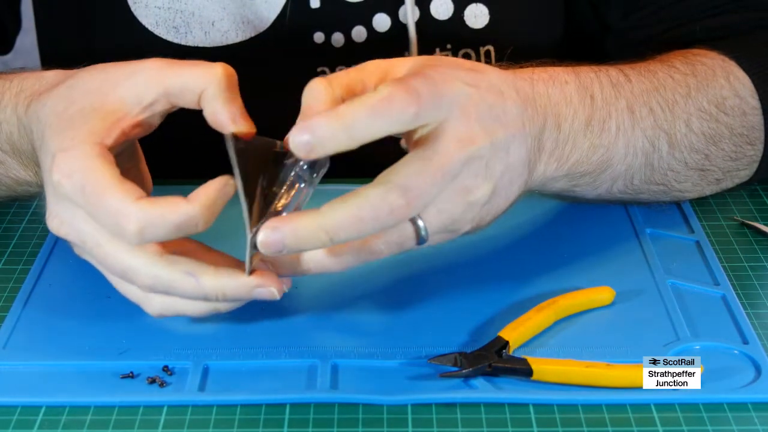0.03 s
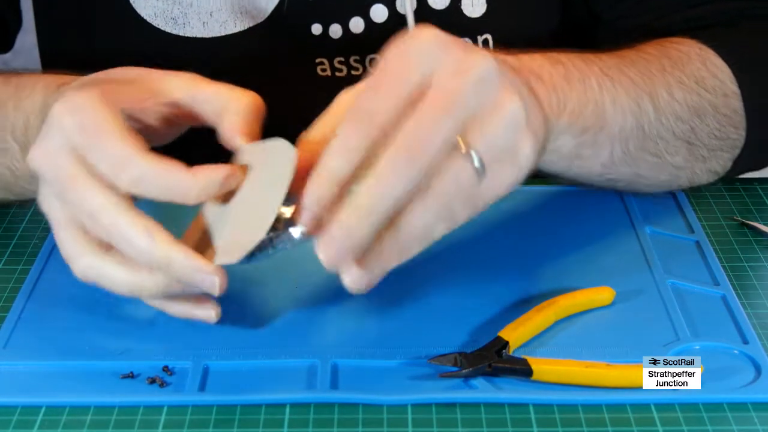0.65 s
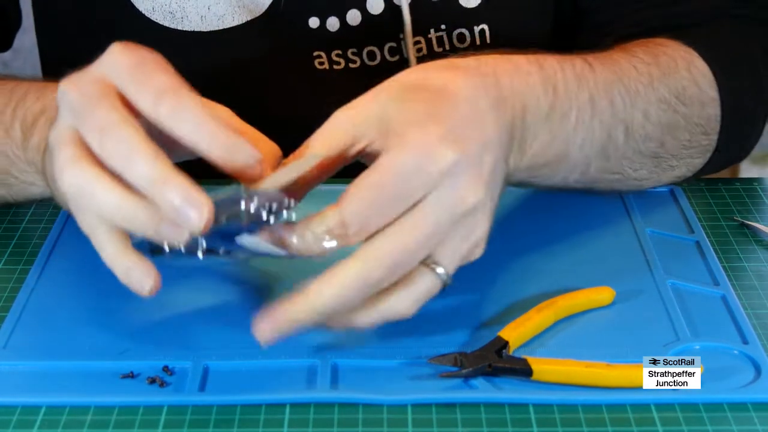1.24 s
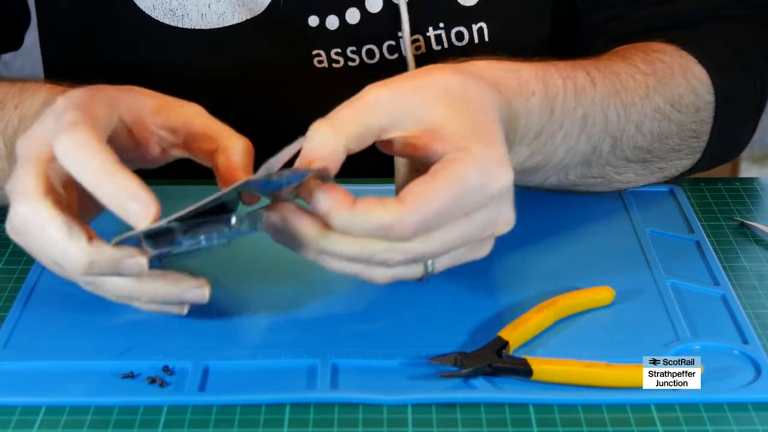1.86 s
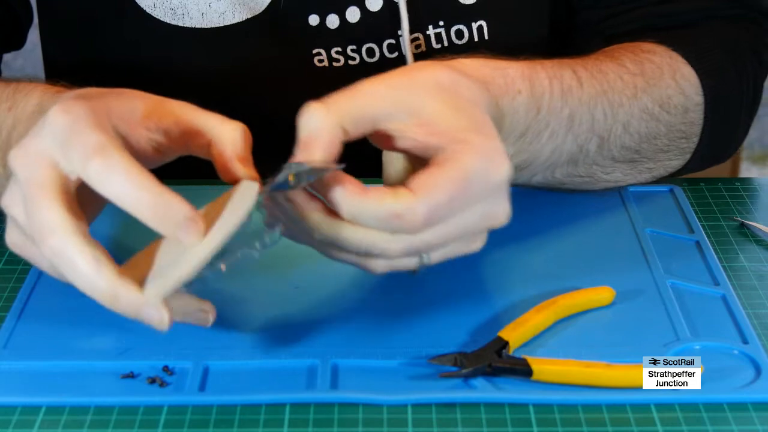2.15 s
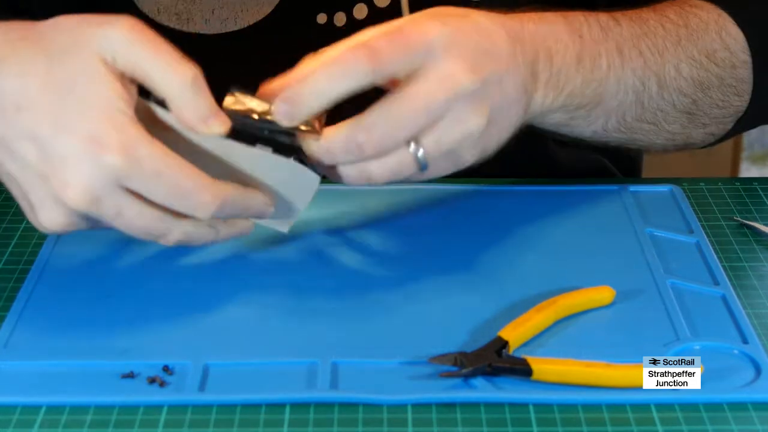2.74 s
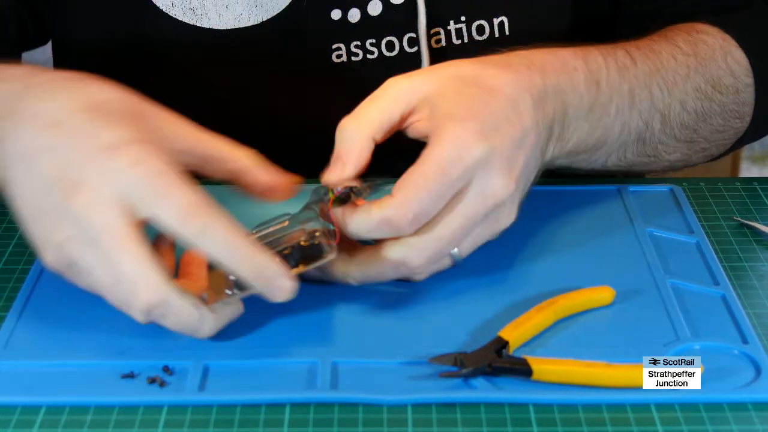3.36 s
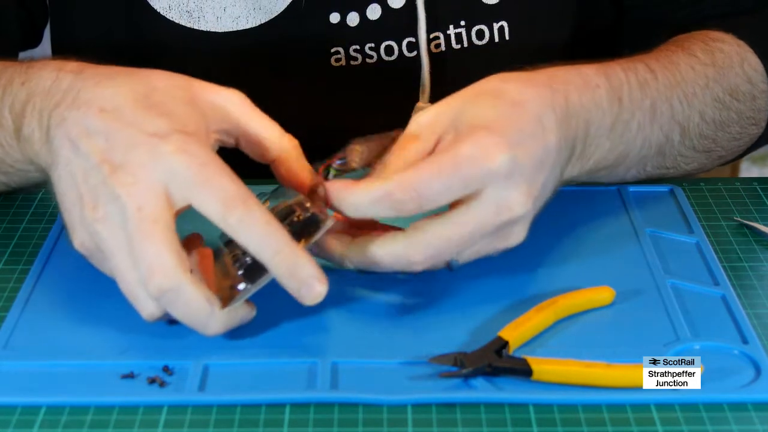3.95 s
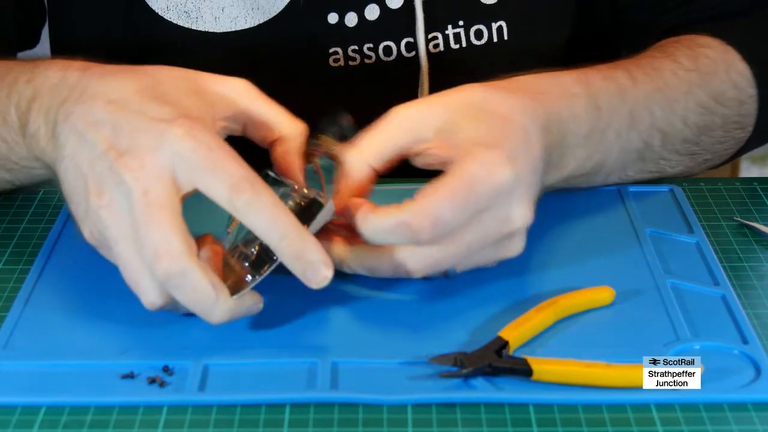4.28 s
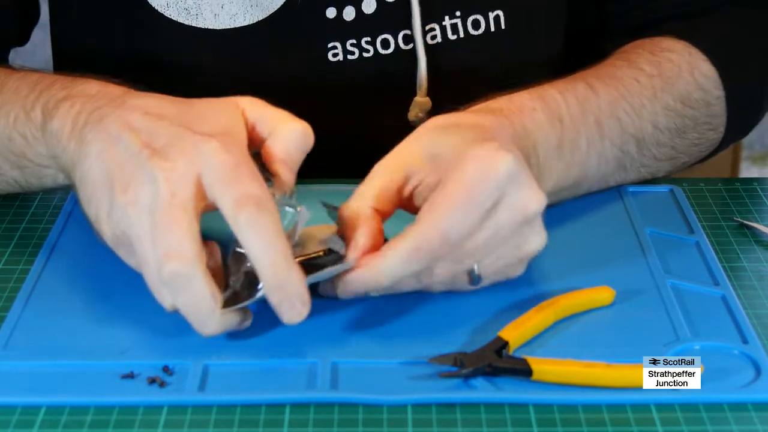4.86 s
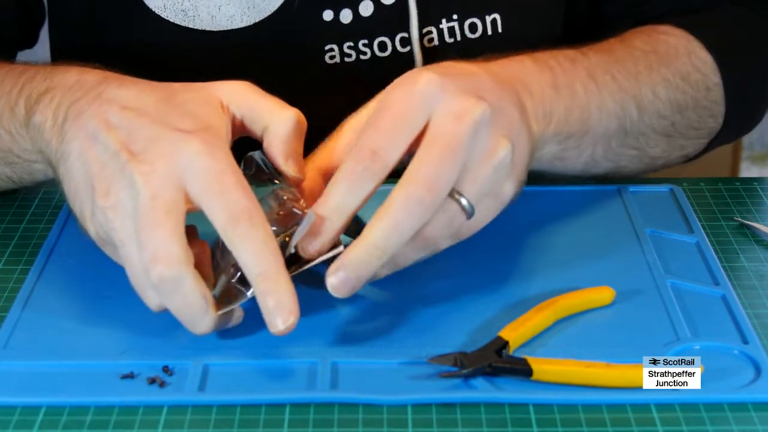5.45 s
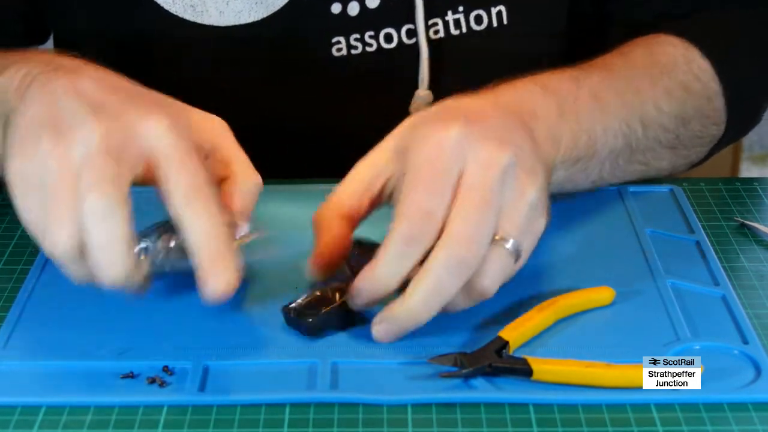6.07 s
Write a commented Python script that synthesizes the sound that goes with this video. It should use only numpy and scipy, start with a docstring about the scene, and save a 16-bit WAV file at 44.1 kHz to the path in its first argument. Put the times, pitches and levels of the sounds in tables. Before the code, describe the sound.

Hands pry a stiff plastic shell off its card backing, close to the microphone in a small, fairly live room. Faint finger rustling and brief scrapes open the scene, and a sharp snap sounds at about 0.6 seconds. A cluster of crackles follows around 1 second, with distinct clicks near 1.7 and 2.3 seconds as the plastic buckles. From about 2.5 to 4.5 seconds, lighter irregular ticks and short scrapes continue as the fingers shift. A quick run of crackles at 4.6 seconds leads into the loudest snap at about 4.7 seconds, followed by a soft rustle and another click at 5 seconds. Small scattered ticks carry on, ending with a duller click just after 6 seconds. Each snap leaves a short room echo, and low steady room noise lies underneath throughout.

```python
"""A faint scrape and rustle of fingers, then sharp snaps: hands pry a stiff plastic blister off its card.
Fingers, card and the packed part slide over the shell by stick-slip friction, in runs of tiny jerks.
The snaps are the shell buckling. Each contact excites the bending modes of the panel it bends.
A desk mat and the walls of a small, fairly live room reflect the sound to a near-mono microphone,
over steady low room noise."""
import sys
import numpy as np
from scipy import signal
from scipy.fft import rfft, irfft, next_fast_len
from scipy.io import wavfile
from scipy.ndimage import uniform_filter1d, minimum_filter1d

SR = 44100
rng = np.random.default_rng(int(sys.argv[2]) if len(sys.argv) > 2 else 0)


def log_audio(samples):
    """Write samples as a 16-bit WAV file to the path given in sys.argv[1]."""
    # one column per channel
    frames = np.atleast_2d(samples).T
    # limit to full scale, then quantise
    limited = np.clip(frames, -1, 1)
    pcm = np.round(limited * 32767).astype(np.int16)
    wavfile.write(sys.argv[1], SR, pcm)


N = 269759


def amp(db):
    """Amplitude ratio of a level in decibels."""
    return 10 ** (np.asarray(db) / 20)


def unit_rms(x):
    """Normalisation to an rms of one."""
    return x / np.sqrt(np.mean(x ** 2) + 1e-20)


def curve(points, hz):
    """Interpolation of (f/Hz, value) points on a logarithmic frequency axis."""
    f, value = np.transpose(points)
    return np.interp(np.log(hz + 1), np.log(f + 1), value)


def add(mix, start_s, sound):
    """Superposition of a sound on the mix, from start_s on."""
    part = mix[max(round(start_s * SR), 0):][:len(sound)]
    part += sound[:len(part)]


def filtered(x, points):
    """Zero-phase filtering by a (f/Hz, gain/dB) curve."""
    size = next_fast_len(len(x) + SR // 10)
    gain = amp(curve(points, np.fft.rfftfreq(size, 1 / SR)))
    return irfft(rfft(x, size) * gain, size)[:len(x)]


def minimum_phase(gain):
    """Minimum-phase impulse response of a gain spectrum: a sharp onset that rings out."""
    log_gain = np.log(np.maximum(np.r_[gain, gain[-2:0:-1]], 1e-5))
    spectrum = np.exp(np.conj(signal.hilbert(log_gain)))
    return np.fft.ifft(spectrum).real[:len(gain)]


# Spectrum of room noise and microphone hiss: f/Hz, relative density/dB
NOISE_SPECTRUM = [(20, -17.5), (50, -8.5), (80, -9), (125, -5), (190, 0.5), (260, 4), (400, 0.5),
                  (700, -3.5), (1500, -14), (4000, -13), (11000, -32.5)]
# Stereo width of that noise: f/Hz, side re mid/dB
NOISE_WIDTH = [(50, 8), (250, 0), (500, 0.5), (1000, 1.5), (2000, 1), (6000, -53)]
def room_noise(level_db=-65, hum_hz=100, hum_db=-84.5):
    """Stationary noise floor with a faint mains hum, as (mid, side)."""
    mid, side = (amp(level_db) * unit_rms(filtered(rng.standard_normal(N), NOISE_SPECTRUM))
                 for _ in range(2))
    hum = amp(hum_db) * np.sqrt(2) * np.sin(2 * np.pi * hum_hz * np.arange(N) / SR)
    return np.array([mid + hum, filtered(side, NOISE_WIDTH)])


# Reverberation time of the room: f/Hz, T60/s
ROOM_T60 = [(150, 0.5), (500, 0.55), (1400, 0.57), (3700, 0.55), (7000, 0.53), (11000, 0.34)]
# Colour of the reverberation: f/Hz, gain/dB
ROOM_COLOUR = [(150, 5), (500, 0), (1500, -2.5), (4000, -4), (10000, 0)]
def reverberation(build_s=0.0036):
    """Diffuse field: dense wall reflections build up and decay exponentially, the top treble fastest."""
    t = np.arange(SR) / SR
    hz, frame_s, spectra = signal.stft(rng.standard_normal(SR), SR, nperseg=256)
    decay = amp(-60 * frame_s / curve(ROOM_T60, hz)[:, None])
    tail = signal.istft(spectra * decay, SR, nperseg=256)[1][:SR]
    tail *= 1 - np.exp(-(t / build_s) ** 2)
    return filtered(tail / np.linalg.norm(tail), ROOM_COLOUR)


# Early reflections from desk, body and near walls: delay/s, gain/dB
REFLECTIONS = [(.0057, -8.5), (.0066, -35), (.0098, -17), (0.015, -19), (0.0193, -13), (.0236, -23)]
# Phase mismatch of the two close microphone capsules: f/Hz, side re mid/dB
CAPSULE_MISMATCH = [(300, -24), (4000, -24), (8000, -30)]
# Stereo width of the reverberation: f/Hz, side re mid/dB
REVERB_WIDTH = [(50, 3.5), (130, -10.5), (280, -8.5), (550, -17.5), (1100, -11), (2500, -23.5),
                (9000, -65.5)]
def room(direct, diffuse, tails=3):
    """Multipath propagation: direct sound, early reflections and reverberation, as (mid, side)."""
    mid, side = direct.copy(), np.zeros(N)
    for delay_s, db in REFLECTIONS:
        add(mid, delay_s, amp(db) * direct)
    mismatch = filtered(signal.hilbert(mid).imag, CAPSULE_MISMATCH)
    phase = 2 * np.pi * np.arange(N) / SR
    for k in range(tails):  # the tail shifts as the hands move: a 1 Hz constant-power crossfade
        feed = diffuse * np.sqrt(2 / tails) * np.cos(phase + np.pi * k / tails)
        mid += signal.oaconvolve(feed, reverberation())[:N]
        side += signal.oaconvolve(feed, reverberation())[:N]
    return np.array([mid, filtered(side, REVERB_WIDTH) + mismatch])


def stick_slip(count, per_s, spread_db, smooth):
    """Stick-slip friction: Poisson-timed jerks of very uneven size over smooth sliding noise."""
    jerks = (rng.random(count) < per_s / SR) * rng.choice([-1., 1.], count)
    jerks *= amp(spread_db * np.minimum(rng.exponential(1, count), 4))
    return unit_rms(jerks) + smooth * rng.standard_normal(count)


# How busily the fingers shift on the shell: t/s, relative level/dB
GRIP_ENVELOPE = [(0, -49.5), (0.25, -57), (0.75, -50), (1.25, -65), (1.6, -53.5), (2.1, -52.5),
                 (2.75, -49.5), (3.1, -56), (3.33, -48.5), (3.6, -56), (4.0, -52.5), (4.45, -49.5),
                 (4.85, -40), (5.1, -57), (5.45, -56), (5.72, -51.5), (5.95, -90)]
# Spectrum of skin rubbing on plastic: f/Hz, relative density/dB
GRIP_SPECTRUM = [(100, -17), (350, 2), (800, -0.5), (1700, 7.5), (3000, 2), (6000, -1.5), (9500, -1.5),
                 (12000, -14.5)]
def grip_rustle(level_db=-11):
    """Friction of shifting skin on the plastic makes a faint ticking and rustle."""
    times, db = np.transpose(GRIP_ENVELOPE)
    friction = stick_slip(N, per_s=400, spread_db=3.0, smooth=0.85)
    envelope = amp(np.interp(np.arange(N) / SR, times, db) + level_db)
    return unit_rms(filtered(friction, GRIP_SPECTRUM)) * envelope


# Each hold bends the shell anew and retunes its panel: start t/s, lower mode f/Hz, height/dB,
# upper mode f/Hz, height/dB, low band re body/dB, edge band re top/dB
HOLDS = [(0, 1750, 0, 2900, 4, -2.5, 3.5), (0.55, 1920, 7.5, 4100, 5, -15.5, 15.5),
         (0.9, 1570, 6, 9600, 9, -15, -4.5), (1.0, 1520, 6.5, 4360, 1.5, -14.5, 6.5),
         (1.3, 1485, 11.5, 4330, 3, -8, 6.5), (1.5, 840, 7.5, 5580, 8, -8.5, 7.5),
         (1.7, 870, 9, 4510, 10, -10.5, 9), (2.0, 1770, -1, 3720, 5, -8, 7),
         (2.3, 890, 2.5, 4640, 6, -12, 2), (2.45, 2290, 3, 4230, 5, -9, 5.5),
         (2.65, 480, 0.5, 5200, 1, -5, 6), (3.02, 526, 5, 1337, 6.5, -11, -2.5),
         (3.15, 1390, 6, 2770, 10, -8, 7.5), (3.45, 1490, 12, 2500, 9, -2, 2),
         (3.7, 1230, 7, 4360, 5.5, -3.5, 7.5), (3.9, 460, 8, 1540, 8, -4.5, 8),
         (4.05, 2300, 12.5, 2750, 6.5, -3.5, 7.5), (4.25, 2330, 7, 3350, 5, -6, 5),
         (4.5, 2310, 12, 2970, 5.5, -9.5, 12), (4.6, 1680, 8, 2800, 6, -6, 6),
         (4.95, 2120, 1, 2670, 4.5, -2.5, 7.5), (5.55, 1890, 6.5, 2370, 7.5, -8.5, 8.5),
         (6.0, 568, 4.5, 2390, 11, -12, 5)]
# Bands of a contact's colour (low, body, middle at 0 dB, edge, top): f/Hz
BANDS_HZ = [370, 920, 1950, 4100, 6600]
# Response common to the scrapes and snaps, the shell's colour with low room resonances around 230-430 Hz: f/Hz,
# gain/dB
COMMON_RESPONSE = [(30, -31.5), (100, -18), (230, -4.5), (310, -0.5), (430, 5.5), (700, -1.5), (1700, 3.5),
                   (3000, 2.5), (4200, 2), (5900, 3.5), (7900, 1), (9500, 5.5), (10800, -1.5),
                   (11800, -13.5)]
def panel(force, at_s, body_db, treble_db, width_hz=120, width_share=0.0097, size=4096):
    """Forced vibration of the panel as held at at_s: a broad colour and two damped modes; unit energy."""
    hold = [row for row in HOLDS if row[0] <= at_s][-1]
    _, lower_hz, lower_db, upper_hz, upper_db, low_db, edge_db = hold
    hz = np.fft.rfftfreq(size, 1 / SR)
    bands_db = (body_db + low_db, body_db, 0, treble_db + edge_db, treble_db)
    colour = amp(curve(list(zip(BANDS_HZ, bands_db)), hz) + curve(COMMON_RESPONSE, hz))
    modes_db = sum(db / (1 + ((hz - f) / (width_hz + width_share * f)) ** 2)
                   for f, db in ((lower_hz, lower_db), (upper_hz, upper_db)))
    power = amp(modes_db) ** 2
    power /= uniform_filter1d(power, size=201)  # the modes gather the energy of their neighbourhood
    sound = signal.fftconvolve(force, minimum_phase(colour * np.sqrt(power)))
    return sound / np.linalg.norm(sound)


# A finger or the card slides over the shell: t/s, duration/s, relative level/dB, body/dB, treble/dB
SCRAPES = [(0, 0.033, -49, 7, 14), (0.284, 0.11, -50.5, -2.5, -5.5), (0.424, 0.023, -47, -8.5, -7.5),
           (0.796, 0.006, -48.5, -6, -1), (0.958, 0.021, -52, 11, 10), (1.016, .039, -48.5, 9.5, -5.5),
           (1.463, 0.06, -45.5, 3.5, -9), (1.518, 0.084, -43.5, -1.5, -11.5), (2.474, .042, -45, 7.5, 2.5),
           (2.798, 0.024, -47, 4, -1), (2.831, 0.038, -50, 5, -9.5), (2.977, 0.019, -43, -3, 0),
           (3.032, 0.061, -46, -8.5, -12.5), (3.174, 0.04, -48.5, 4, -20), (3.218, 0.046, -45.5, -33, -21),
           (3.333, 0.014, -50, -15, -19), (3.49, 0.082, -58, -21, -42), (3.755, 0.057, -55, -3, -23),
           (3.838, .03, -47.5, 10, -27), (4.105, 0.026, -49, -5, -11.5), (4.565, 0.042, -42, -12, -17),
           (4.648, 0.039, -44, 4.5, -1), (5.223, 0.026, -54.5, -3, -11), (5.359, 0.026, -54.5, -7, -19),
           (5.432, 0.029, -50, -30, -15.5), (5.572, .049, -52.5, 0.5, -11), (5.676, 0.027, -46, -27.5, -27),
           (5.779, 0.031, -46, -6.5, -23)]
def scrapes(level_db=-2.0, fade_share=0.37):
    """Frictional excitation: each run of slips swells and fades, driving the panel beneath it."""
    out, span = np.zeros(N), SR // 5
    for start_s, length_s, db, body_db, treble_db in SCRAPES:
        count = int(length_s * SR)
        drift = unit_rms(uniform_filter1d(rng.standard_normal(span), size=200))
        catching = amp(3 * drift)  # the finger grabs and lets go
        friction = catching * stick_slip(span, per_s=1500, spread_db=2.5, smooth=0.78)
        force = friction[:count] * signal.windows.tukey(count, fade_share)
        gain = amp(db + level_db) * np.sqrt(count)
        add(out, start_s, gain * panel(force, start_s, body_db, treble_db))
    return out


def whitened(burst, size=4096):
    """Spectral whitening: the broad spectrum of a burst is levelled and its fine ripple stays."""
    broad_power = uniform_filter1d(abs(rfft(burst, size)) ** 2, size=91)
    return signal.fftconvolve(burst, minimum_phase(1 / np.sqrt(broad_power + 1e-9)))[:size]


def dispersed(x, lag_s=0.000871, reference_hz=1000, size=8192):
    """Dispersion: bending waves carry treble faster than bass; lag_s is the group delay at reference_hz."""
    hz = np.fft.rfftfreq(size, 1 / SR)
    phase = 4 * np.pi * lag_s * np.sqrt(hz * reference_hz)
    return irfft(rfft(x, size) * np.exp(-1j * phase), size)


# The shell buckles or is knocked; a broad patch has more body, a sharp crease more treble:
# t/s, relative level/dB, crumple T60/s, body/dB, treble/dB
SNAPS = [(0.276, -52.5, 0.022, -3, -3), (0.4365, -42.5, 0.012, -3, -13.5), (0.6056, -21.5, 0.014, -10, -14),
         (0.8766, -44.5, .01, 4, -10.5), (0.9221, -37.5, 0.03, -6, 1.5), (1.0506, -39.5, .016, -9, 0),
         (1.066, -29.5, 0.021, 5.5, 1.5), (1.096, -36, 0.012, 6, -6.5), (1.3213, -54, 0.013, -15, -9),
         (1.3638, -38.5, 0.0075, 4, 4.5), (1.4608, -42, 0.018, 4, -6), (1.576, -38, .018, 5.5, -2.5),
         (1.723, -30.5, 0.0085, 6.5, -1), (2.0734, -53, 0.024, 8, -1), (2.171, -47, 0.011, 7, 2),
         (2.1998, -37.5, 0.014, -5.5, -9.5), (2.2395, -42, 0.021, 7.5, -3.5),
         (2.3392, -30, 0.0079, 1.5, -1.5), (2.3448, -34, 0.063, 13.5, -1), (2.398, -40, 0.012, -8, -17),
         (2.4986, -39.5, 0.024, -11, -18), (2.505, -42.5, 0.015, -3, -19), (2.9322, -45, 0.015, -3.5, 2),
         (2.99, -37.5, 0.0097, -1, -5.5), (3.1061, -37, 0.018, 8, -3.5), (3.2008, -41.5, 0.035, -8, -20.5),
         (3.383, -54, 0.011, -3, 12), (3.797, -47.5, 0.0075, 19, 10), (3.856, -39, .01, 8.5, 3),
         (3.937, -45, 0.019, 12.5, -7.5), (3.9823, -49.5, 0.014, -11.5, -26),
         (4.1042, -46.5, 0.014, -18.5, -27.5), (4.119, -42, 0.016, -9.5, -23),
         (4.2721, -42, 0.012, 16.5, 11), (4.291, -39.5, 0.0094, -3, -14), (4.3013, -36, 0.019, -7, -14),
         (4.3083, -42.5, .015, -6, -5.5), (4.527, -45, 0.022, -9, -19.5), (4.5743, -40.5, .01, 2.5, -11.5),
         (4.6068, -32.5, 0.017, -7, -10.5), (4.6279, -33, 0.031, -7.5, -14.5),
         (4.6815, -13.5, .006, -6.5, -7.5), (4.7004, -35, .015, 6.5, -11),
         (5.0059, -37, 0.019, -4.5, -10.5), (5.148, -48.5, 0.014, -3.5, -20),
         (5.4343, -50, 0.022, -10, -14), (5.4485, -43.5, 0.022, -13, -17), (5.6122, -42.5, 0.016, 2, -15),
         (5.6785, -41, 0.021, -10.5, -20), (5.7902, -47, 0.026, -10, -14), (6.0395, -51, 0.019, -8, -14.5),
         (6.1115, -34, 0.016, 9.5, -21.5)]
def snaps(direct_db=-1.5, diffuse_db=-1, jolt=2.57, rise_share=0.021):
    """Snap-through buckling: a crease flips with one jolt, then crumples briefly; as (direct, diffuse)."""
    direct, diffuse = np.zeros((2, N))
    t = np.arange(SR // 20) / SR
    blow = np.sqrt(.009 * SR)  # the energy of 9 ms at unit rms
    for start_s, db, t60, body_db, treble_db in SNAPS:
        contact = start_s, body_db, treble_db
        age = t / t60
        envelope = amp(-60 * age) * (1 - np.exp(-age / rise_share))
        force = rng.standard_normal(len(t)) * envelope
        force[0] = jolt
        bending_wave = dispersed(whitened(force))
        add(direct, start_s, amp(db + direct_db) * blow * panel(bending_wave, *contact))
        # summed over all directions the crumpling's ripple evens out, so an impulse feeds the room
        add(diffuse, start_s, amp(db + diffuse_db) * blow * panel(np.ones(1), *contact))
    return np.array([direct, diffuse])


def scene(balance_db=.12):
    """Superposition of package and room, almost straight ahead, as (left, right)."""
    direct, diffuse = snaps() + scrapes() + grip_rustle()  # friction feeds both paths alike
    mid, side = room(direct, diffuse) + room_noise()
    return np.array([(mid + side) * amp(balance_db), (mid - side) * amp(-balance_db)])


def record(dry, ceiling=.93, cutoff_hz=12000):
    """Peak limiting over about a millisecond, then band limiting by a low-pass filter."""
    headroom = np.minimum(1, ceiling / (abs(dry).max(0) + 1e-9))
    gain = uniform_filter1d(minimum_filter1d(headroom, size=45), size=45)
    lowpass = signal.firwin(201, cutoff_hz, window=("kaiser", 8), fs=SR)
    return signal.oaconvolve(dry * gain, lowpass[None], "same")


dry = scene()
out = record(dry)
log_audio(out)
```